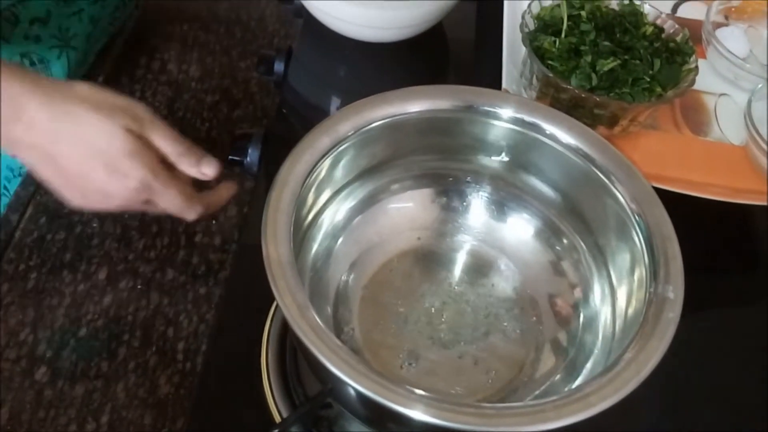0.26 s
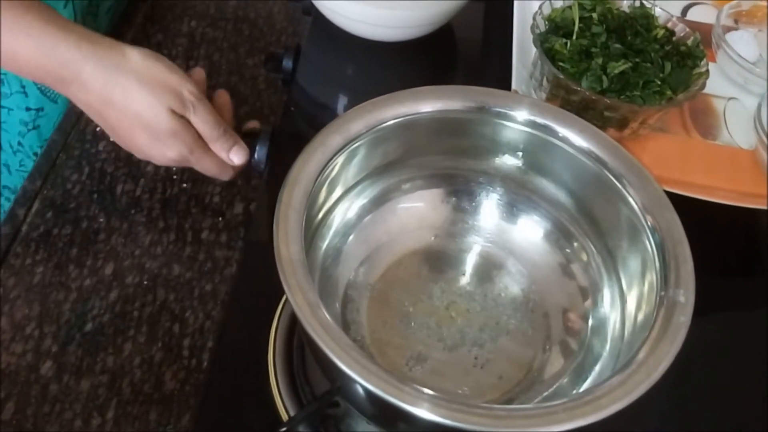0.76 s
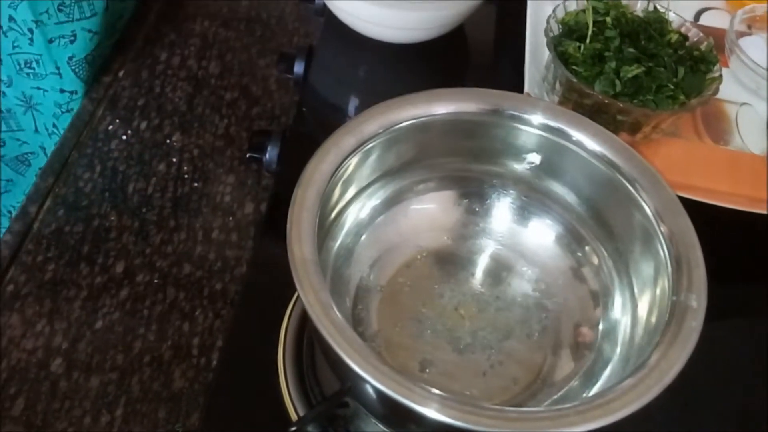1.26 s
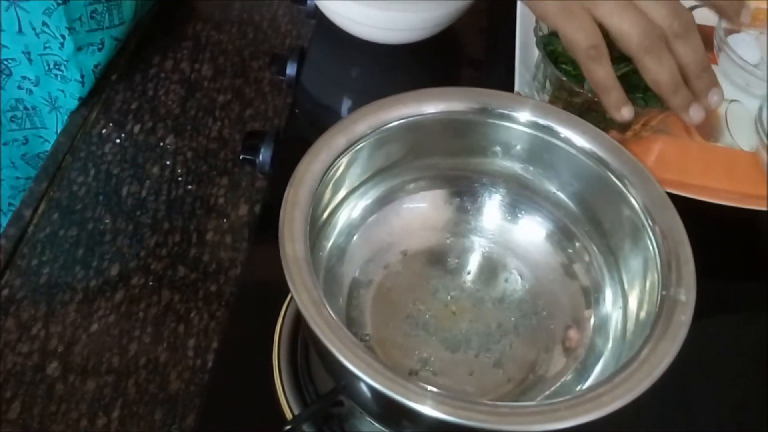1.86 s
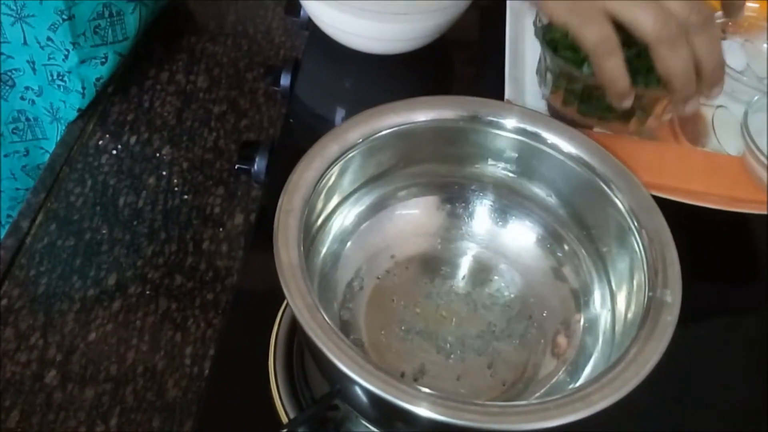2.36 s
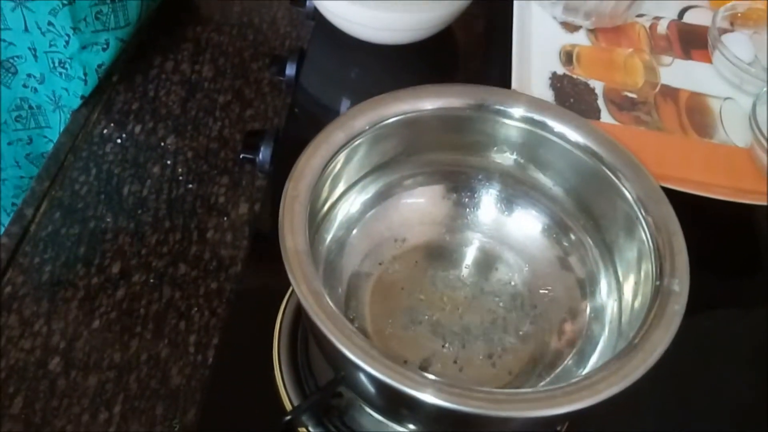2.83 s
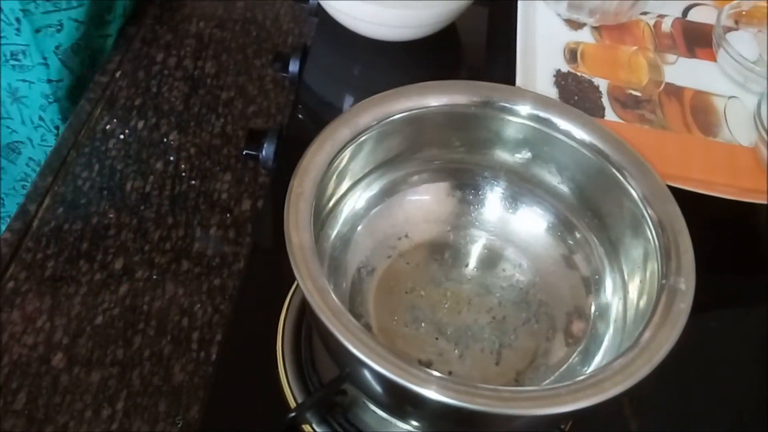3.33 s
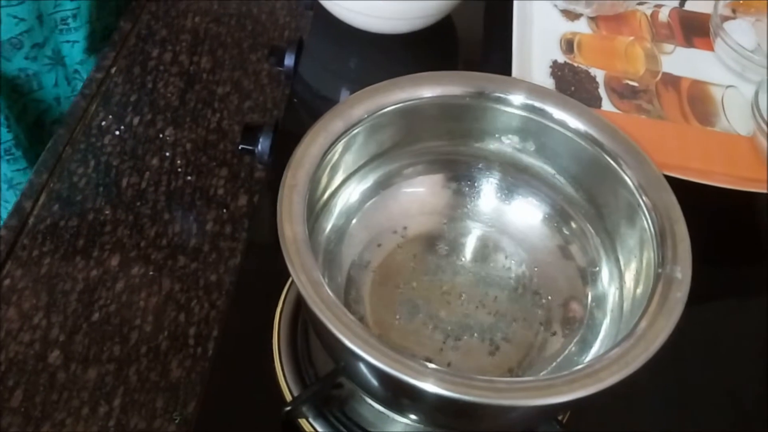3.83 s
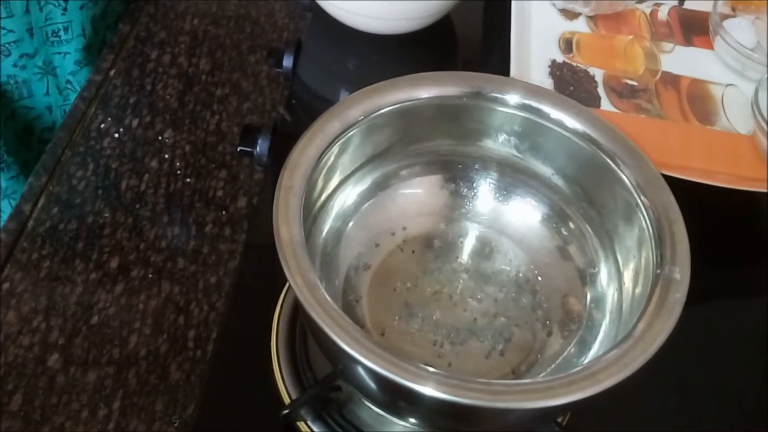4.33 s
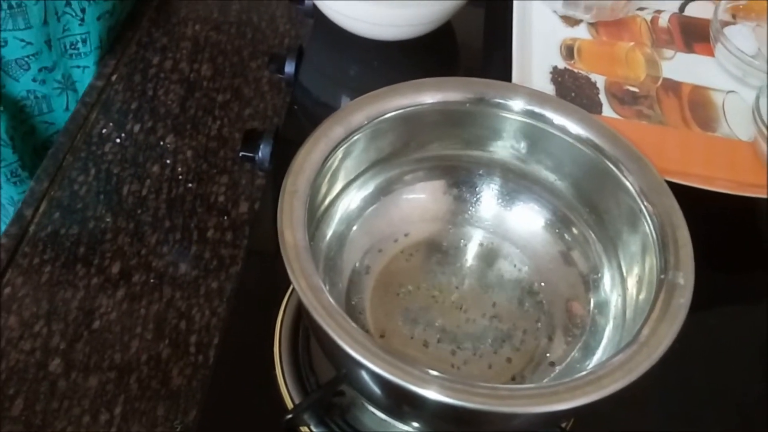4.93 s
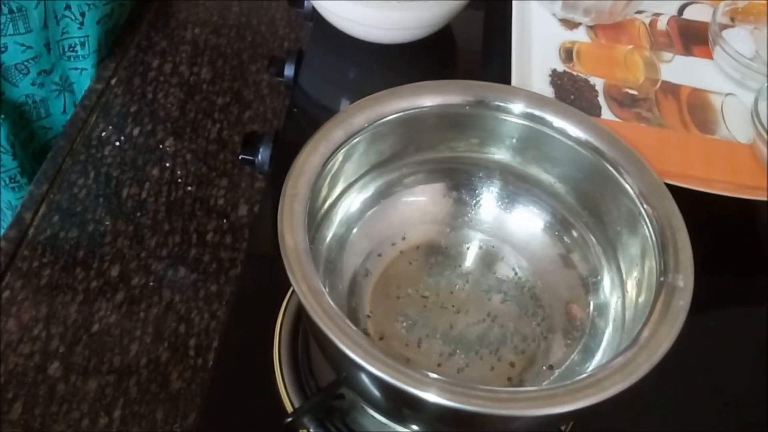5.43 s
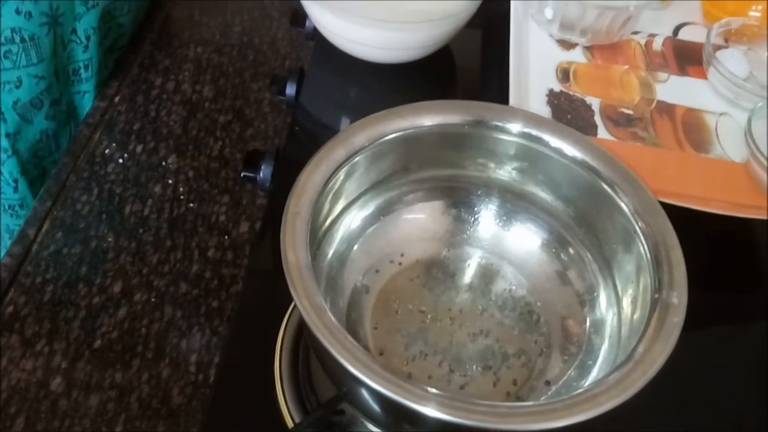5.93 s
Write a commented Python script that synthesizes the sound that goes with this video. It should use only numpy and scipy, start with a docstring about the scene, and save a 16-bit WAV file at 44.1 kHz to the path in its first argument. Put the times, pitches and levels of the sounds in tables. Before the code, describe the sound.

Rapid, uneven popping of seeds in oil, dry and snappy, with small metallic pings from the pot wall and quick ticks of droplets. A quiet low room noise and thin sizzle lie underneath. Popping thickens after the first second and continues to the end, interrupted by nothing but joined by a short dull scrape past the middle. Close stereo microphone, left side louder, short bright kitchen reflections.

```python
"""Low house noise, mostly in opposite phase at two ports, and fine crackle run throughout a small hard kitchen.
Seeds burst in hot oil in a round steel pot from the first moments: pitched cracks scattered by the pot,
each shaking its wall; the room answers. From 1.4 s spatter strikes the left port and wet bursts throw
ticking droplets. Near 3.3 s a pure low tone swells once, then something is dragged on the counter."""
import sys
import numpy as np
from scipy import signal
from scipy.fft import rfft, irfft, next_fast_len
from scipy.io import wavfile

SR = 44100
rng = np.random.default_rng(int(sys.argv[2]) if len(sys.argv) > 2 else 0)


def unload_wav(signal):
    """Save mono or channel-first audio to the path in sys.argv[1] as 16-bit WAV at rate SR, clipped to [-1, 1]."""
    wavfile.write(
        sys.argv[1],
        SR,
        np.round(np.clip(np.atleast_2d(signal).T, -1, 1) * 32767).astype(np.int16),
    )


def linear_from_db(decibels):
    """Turn decibels (scalar or array-like) into linear amplitude factors; 0 gives 1."""
    return 10 ** (np.asarray(decibels, float) / 20)


N = 272793
SPOTS = 4  # places on the pot bottom where seeds burst


def at_hz(points, hz, column=1):
    """Table column interpolated over log frequency."""
    points = np.array(points)
    return np.interp(np.log(hz + 1), np.log(points[:, 0]), points[:, column])


def causal(db):
    """Minimum-phase response with the given levels on an rfft grid."""
    cepstrum = irfft(db * np.log(10) / 20)
    half = len(cepstrum) // 2
    cepstrum[1:half] *= 2
    cepstrum[half + 1:] = 0
    return np.exp(rfft(cepstrum))


def convolve(x, response):
    """FFT convolution, cut to N samples."""
    size = next_fast_len(N + response.shape[-1])
    return irfft(rfft(x, size) * rfft(response, size), size)[..., :N]


def dying(t60_s, size):
    """Exponential decay, 60 dB down after t60_s."""
    return linear_from_db(-60 * np.arange(size) / (t60_s * SR))


# Left-right likeness of steady noise. Each row: frequency in Hz, correlation (limited to -1..1).
LIKENESS = [(60, -1.16), (130, -0.85), (300, -1), (650, -0.15), (1400, 0.15)]


def steady(points, lines=()):
    """Stereo noise of a given spectrum and narrow lines, port likeness set by frequency; rms 1."""
    size = next_fast_len(N)
    hz = np.fft.rfftfreq(size, 1 / SR)
    mid, side = rfft(rng.standard_normal((2, size)))
    alike = np.clip(at_hz(LIKENESS, hz), -1, 1)
    pair = np.sqrt(1 + alike) * mid + np.sqrt(1 - alike) * side * [[1], [-1]]
    level_db = at_hz(points, hz)
    for line_hz, width_hz, db in lines:
        level_db = level_db + db / (1 + (2 * (hz - line_hz) / width_hz) ** 2)
    noise = irfft(pair * linear_from_db(level_db), size)[:, :N]
    return noise / np.sqrt(np.mean(noise ** 2) + 1e-20)


# Spectrum of house noise and sizzle. Each row: frequency in Hz, relative density in dB per Hz.
FLOOR_SPECTRUM = [(30, -17), (110, -3.5), (190, -5.5), (300, -9), (800, -12), (1200, -16), (2200, -16),
                  (5500, -4.5), (8000, -7.5), (16000, -18)]
# Wavering hum lines. Each row: frequency in Hz, width in Hz, height over the house noise in dB.
HUM_LINES = [(129.4, 7.6, 4.5), (429.8, 6.1, 10.5), (488, 10.5, 9.5)]
# Swelling and sinking of the lows. Each row: time in seconds, relative level in dB.
RUMBLE = [(0, -40), (.15, -48.5), (.5, -48.5), (3.2, -46.5), (6.19, -44)]


def house_and_sizzle():
    """Steady noise: the lows swell and sink, the rest holds its level."""
    floor = steady(FLOOR_SPECTRUM, HUM_LINES)
    lows = signal.sosfilt(signal.butter(1, 700, fs=SR, output="sos"), floor)
    swell_db = np.interp(np.arange(N) / SR, *np.transpose(RUMBLE))
    return linear_from_db(swell_db + 17.5) * lows + linear_from_db(-50.5) * (floor - lows)


# Colour of pot mouth and microphone. Each row: frequency in Hz, left level in dB, right level in dB.
MOUTH = [(292, -70, -25), (735, -1, -14.5), (1260, -15.5, -9.5), (1730, 1, -9.5), (2070, -8, -10),
         (3100, 3.5, -2.5), (3900, 6, -3), (4400, 1.5, -12), (5000, 6.5, 3.5), (7050, 2.5, 6),
         (7580, -2.5, -2), (18200, -18, -48.5)]
# The first paths build up and die fast; later ones are weaker and last longer.
RISE_T60_S, FRONT_T60_S, LATE_DB = 0.002, 0.005, -10


def cracks(s, peak_db, pitch_hz, spit_db, scatter_t60_s):
    """A steam bubble rings a few cycles; the curved pot sends it by many short paths, others to each port."""
    size = 1024
    hz = np.fft.rfftfreq(size, 1 / SR) + 1
    path_decay = dying(FRONT_T60_S, size) + linear_from_db(LATE_DB) * dying(scatter_t60_s, size)
    paths = rng.standard_normal((len(s), 2, size)) * (1 - dying(RISE_T60_S, size)) * path_decay
    tune = hz / pitch_hz[:, None]
    bubble = 1 / (1 + 4j * (tune - 1 / tune))
    treble = 1 / (1 + 1 / (1j * hz / 8500)) ** 2
    colour = bubble + 0.45 + linear_from_db(spit_db)[:, None] * treble
    mouth = np.array([causal(at_hz(MOUTH, hz, column=c)) for c in (1, 2)])
    response = colour[:, None] * mouth
    shapes = irfft(rfft(paths) * response)
    # both ports get the same share of each burst
    heard = np.linalg.norm(shapes, axis=2) / np.linalg.norm(response, axis=2)
    shapes[:, 1] *= (heard[:, 0] / heard[:, 1])[:, None]
    left_peak = np.abs(shapes[:, 0]).max(axis=1)
    shapes *= (linear_from_db(peak_db) / left_peak)[:, None, None]
    out = np.zeros((SPOTS, 2, N + size))
    for k, (start, shape) in enumerate(zip((s * SR).astype(int), shapes)):
        out[k % SPOTS, :, start:start + size] += shape
    return out[..., :N]


# Slow change of the treble spit. Each row: time in seconds, change in dB.
LIVELY = [(0, -8), (.7, -3.5), (1.5, -0.5), (2.0, -1.5), (2.5, -1.5), (3.2, -4), (3.9, 2.5), (4.5, -3.5),
          (5.3, -3.5), (5.7, -9.5), (6.19, -14)]
SPIT_DB, SPIT_AT_HZ, SPIT_DB_PER_OCTAVE, SPIT_CHANCE_DB = 1.5, 4700, 22, 5


def spit(s, pitch_hz, chance):
    """Treble drive of each burst in dB: higher cracks spit more."""
    lively_db = np.interp(s, *np.transpose(LIVELY))
    pitch_db = SPIT_DB_PER_OCTAVE * np.log2(pitch_hz / SPIT_AT_HZ)
    return SPIT_DB + pitch_db + lively_db + SPIT_CHANCE_DB * chance


CRACKLES_PER_S, CRACKLE_DB, CRACKLE_SPREAD_DB = 85, -35, 4.5
CRACKLE_LOW_HZ, CRACKLE_HIGH_HZ = 3400, 6800


def crackle():
    """Small bursts at random, most of them faint, a few clearly heard."""
    draw = rng.random((int(CRACKLES_PER_S * N / SR), 4))
    s = draw[:, 0] * N / SR
    peak_db = CRACKLE_DB - CRACKLE_SPREAD_DB * np.log(draw[:, 1] + 0.05)
    pitch_hz = CRACKLE_LOW_HZ + (CRACKLE_HIGH_HZ - CRACKLE_LOW_HZ) * draw[:, 2]
    spit_db = spit(s, pitch_hz, 2 * draw[:, 3] - 1)
    return cracks(s, peak_db, pitch_hz, spit_db, scatter_t60_s=0.01)


# Single seed bursts. Each row: start in seconds, left peak in dB, pitch of the crack in Hz.
POPS = [(.049, -4.5, 7000), (0.175, -23, 6700), (.277, -26, 3900), (0.34, -5, 7400), (0.353, -9, 5000),
        (0.37, -4, 4280), (0.569, -19, 3730), (0.602, -0.5, 5500), (0.647, -2, 3540), (0.7017, 7.5, 5700),
        (0.7735, -8.5, 5400), (0.8266, -7, 5440), (0.985, -13.5, 4540), (1.046, -22, 5000),
        (1.062, 1, 3100), (1.184, 1.5, 3700), (1.2392, -9, 5500), (1.3116, -3, 5300), (1.4414, 0.5, 5400),
        (1.488, 0.5, 6400), (1.494, 0, 2840), (1.5326, -1.5, 4700), (1.552, -4, 3240), (1.64, -4.5, 4200),
        (1.6483, 0, 5330), (1.664, -10, 4800), (1.6722, -6, 5000), (1.7482, -15, 4000), (1.7568, 8, 5630),
        (1.77, 5, 3680), (1.865, 4, 4160), (1.8707, -1, 3700), (1.902, -13, 4080), (1.9236, -1, 5330),
        (1.9509, 0, 4100), (1.98, -3, 5000), (2.006, -7.5, 3800), (2.039, -15.5, 5700), (2.1751, -10, 4700),
        (2.1857, -6, 5200), (2.222, -10.5, 3900), (2.2599, 4, 5100), (2.303, -15, 6000), (2.342, 2, 5000),
        (2.372, -3, 4700), (2.4142, 1.5, 5350), (2.4314, -10, 5500), (2.486, -2, 5000),
        (2.5675, -15.5, 6250), (2.6122, -19.5, 4600), (2.6405, -4.5, 5300), (2.7032, -13, 4700),
        (2.722, -3, 4400), (2.771, -11, 5400), (2.8174, 3.5, 2900), (2.92, 4, 4700), (2.9519, -3, 4270),
        (2.9557, 5.5, 4130), (3.0365, -4, 5050), (3.072, -6.5, 5000), (3.0836, -5.5, 3770),
        (3.124, 9.5, 5300), (3.1527, 4, 4700), (3.216, 2, 4730), (3.238, -10, 5500), (3.241, 2, 5850),
        (3.285, -8, 5300), (3.3055, 2, 5130), (3.3216, 3, 3900), (3.334, -9, 3900), (3.4487, -7, 6560),
        (3.462, -3, 4400), (3.5141, -9, 5340), (3.5253, -5, 4760), (3.5761, 4, 3800), (3.6947, -12, 6700),
        (3.74, -13.5, 5500), (3.755, 1.5, 4740), (3.77, -1, 3450), (3.778, -0.5, 4350), (3.8557, 7.5, 4800),
        (3.8855, -18, 5700), (3.9232, -3, 5000), (3.9319, -1, 3240), (4.0108, -8.5, 4500),
        (4.0248, -9, 3900), (4.046, 1, 5000), (4.0549, -4.5, 5400), (4.2191, -0.5, 4200), (4.287, -9, 3700),
        (4.308, -6.5, 3120), (4.3267, -3, 4600), (4.367, -9, 4700), (4.4845, 0, 5400), (4.5124, -1, 5670),
        (4.546, -2, 4160), (4.5703, 2, 4360), (4.581, 1.5, 4160), (4.6163, 2, 3740), (4.6227, -4.5, 5600),
        (4.7639, -9.5, 6500), (4.8, -4.5, 4100), (4.826, -14, 4530), (4.8578, -2.5, 4400),
        (4.9291, 2, 5030), (5.051, -10, 5560), (5.0836, 3.5, 3900), (5.0934, 1, 5060), (5.1413, -6, 4930),
        (5.15, -21, 4950), (5.1696, -2, 5300), (5.2166, -8, 4430), (5.2536, -5.5, 3900), (5.29, 1.5, 4500),
        (5.311, -15, 4350), (5.3267, 5.5, 4700), (5.3503, 2, 4630), (5.371, -4.5, 3320),
        (5.4552, -8.5, 3980), (5.518, -5.5, 3930), (5.6113, 1, 4270), (5.6927, -0.5, 4400),
        (5.7622, -14, 6200), (5.773, 1.5, 3750), (5.8537, -0.5, 5000), (5.8806, -11.5, 3400),
        (5.9036, 3.5, 5200), (5.9517, -4, 3800), (6.0965, -0.5, 4170), (6.1028, -8, 4470),
        (6.1397, -8.5, 5600), (6.152, -2, 3900)]


def pops():
    """Timed bursts, loud and faint: steam cracks scattered inside the pot."""
    s, peak_db, pitch_hz = np.transpose(POPS)
    spit_db = spit(s, pitch_hz, rng.standard_normal(len(s)))
    return cracks(s, peak_db, pitch_hz, spit_db, scatter_t60_s=0.024)


# Seeds thrown against the wall. Each row: time in seconds, blow in dB, extra on the lowest mode in dB
# (strong when the blow lands near the bottom).
WALL_HITS = [(0.647, -47.5, 10), (1.183, -48.5, 14), (1.756, -44, -25), (3.072, -45.5, 4),
             (3.152, -46, -19), (3.318, -43, 6), (3.755, -39.5, 17.5), (3.857, -40.5, -3),
             (4.223, -45.5, -28), (4.484, -54, 30), (5.326, -39.5, 7), (5.518, -49, 21.5)]
# Pot wall modes. Each row: frequency in Hz, relative level in dB, t60 in seconds.
WALL_MODES = [(715, 5, .04), (1308, 11, .55), (1770, 2, .1)]
SHAKE_DB, SHAKE_CHANCE_DB = -56, 4  # shake of each burst relative to its peak, and its random spread


def wall():
    """Every timed burst and thrown seed strikes each mode, a decaying sine, with a strength of its own."""
    shakes = [(s, db + SHAKE_DB + SHAKE_CHANCE_DB * rng.standard_normal(), -10) for s, db, _ in POPS]
    s, blow_db, low_db = np.transpose(list(shakes) + list(WALL_HITS))
    chance_db = 2 * rng.standard_normal((len(s), len(WALL_MODES)))
    chance_db[:, 0] += low_db
    out = np.zeros(N)
    for k, (hz, mode_db, t60_s) in enumerate(WALL_MODES):
        clicks = np.full(N, 1e-18)
        clicks[(s * SR).astype(int)] = linear_from_db(blow_db + mode_db + chance_db[:, k])
        r, w = linear_from_db(-60 / (t60_s * SR)), 2 * np.pi * hz / SR
        out += signal.lfilter([0, np.sin(w)], [1, -2 * r * np.cos(w), r * r], clicks)
    return out * [[1], [-linear_from_db(-29.0)]]


# Room answer. Each row: frequency in Hz, t60 in seconds, relative level in dB.
ROOM = [(504, 0.21, 3.5), (2030, 0.27, 5), (5000, 0.31, -3.5), (8600, 0.27, -0.5), (14900, 0.26, 3.5)]


def kitchen(x, first_ms, build_ms):
    """Noise dying band by band, another for each spot; the first walls answer after first_ms."""
    size = SR * 2 // 5
    edges_hz = 200 * 2 ** np.arange(0, 6.6, 0.5)
    white = rng.standard_normal((2, SPOTS, 2, size))
    out = 0
    for k, (low, high) in enumerate(zip(edges_hz, edges_hz[1:])):
        band_filter = signal.butter(2, [low, high], "band", fs=SR, output="sos")
        band = signal.sosfilt(band_filter, white[k % 2])
        centre_hz = np.sqrt(low * high)
        out = out + band * dying(at_hz(ROOM, centre_hz), size) * linear_from_db(at_hz(ROOM, centre_hz, column=2))
    ms = np.arange(size) * 1000 / SR
    response = out * np.clip((ms - first_ms) / build_ms, 0, 1)
    response = response / np.sqrt(np.sum(response ** 2) / 2 / SPOTS)
    return convolve(x, response).sum(axis=0)


# Spatter on the left port. Each row: start in seconds, drive in dB, decay time in milliseconds.
SPATTER = [(1.4407, -2.5, 0.24), (2.305, -11, 0.58), (2.722, 8, 0.057), (3.755, -7.5, 0.3),
           (3.858, -4, 1.05), (4.056, -10, 0.33), (4.353, -15.5, 0.87), (4.482, -15, 1.6),
           (5.083, -4, 0.25)]
PORT_LOW_HZ = 60


def spatter():
    """One-sided push: the membrane goes in quickly, relaxes and swings back slowly."""
    size = 2000
    out, t = np.zeros(N + size), np.arange(size) / SR
    for s, drive_db, length_ms in SPATTER:
        u = t * 1000 / length_ms
        push = (1 - np.exp(-u * 3.4)) * (np.exp(-u) - 0.3 * np.exp(-u * 0.29))
        start = int(s * SR)
        out[start:start + size] -= 2 * linear_from_db(drive_db) * push
    high_pass = signal.butter(1, PORT_LOW_HZ, "high", fs=SR, output="sos")
    return signal.sosfilt(high_pass, out[:N]) * [[1], [0]]


# Wet bursts throwing droplets. Each row: start in seconds, highest droplet peak in dB.
SPRAYS = [(1.49, -10.5), (1.757, -27), (1.865, -27), (2.415, -26), (2.957, -12), (3.856, -12),
          (4.358, -14.5), (4.485, -9), (5.327, -16)]
DROPLETS_PER_SPRAY, SPRAY_S, DROPLET_HZ, DROPLET_SPIT_DB = 20, 0.022, 6000, 9


def sprays():
    """Droplets land in quick bright ticks that thin out."""
    s, peak_db = np.repeat(SPRAYS, DROPLETS_PER_SPRAY, axis=0).T
    draw = rng.random((len(s), 3))
    late_s = -SPRAY_S * np.log(draw[:, 0] + 0.02)
    pitch_hz = DROPLET_HZ * (0.7 + 0.6 * draw[:, 1])
    spit_db = np.full(len(s), DROPLET_SPIT_DB)
    return cracks(s + late_s, peak_db - 8 * draw[:, 2], pitch_hz, spit_db, scatter_t60_s=0.01)


SWELL_S, SWELL_HZ, SWELL_DB, SWELL_RISE_S, SWELL_FALL_S = 3.31, 122.5, -34.5, 0.17, 0.17


def hum_swell():
    """A steady low sine rises and falls once, in opposite phase at the ports."""
    since = np.arange(N) / SR - SWELL_S
    shape = np.exp(-(since / np.where(since < 0, SWELL_RISE_S, SWELL_FALL_S)) ** 2)
    return linear_from_db(SWELL_DB) * shape * np.sin(2 * np.pi * SWELL_HZ * since) * [[1], [-1]]


DRAG_S, DRAG_DB, DRAG_ATTACK_S, DRAG_HOLD_S, DRAG_FADE_DB_PER_S = 3.47, -31.5, 0.076, 0.051, 70


def drag():
    """Something dragged on the counter: low scraping noise swells, holds and fades."""
    since = np.arange(N) / SR - DRAG_S
    fade_db = DRAG_FADE_DB_PER_S * np.maximum(since - DRAG_ATTACK_S - DRAG_HOLD_S, 0)
    shape = np.clip(since / DRAG_ATTACK_S, 0, 1) ** 2 * linear_from_db(DRAG_DB - fade_db)
    return shape * steady([(60, -6), (170, 10.5), (550, -1), (1200, -58)])  # (Hz, dB per Hz)


def scene():
    """Pot, its room answer, spatter and background at the two ports."""
    pot = pops() + crackle() + sprays()
    pot[0] += wall()
    room = kitchen(pot, first_ms=3.0, build_ms=8.0)
    direct = pot.sum(axis=0) * linear_from_db([[0], [-4]])  # the right port faces away from the pot
    background = (house_and_sizzle() + drag() + hum_swell()) * linear_from_db([[2.5], [-2.5]])
    return direct + linear_from_db([[-6], [-3]]) * room + spatter() + background


def roll_off(x):
    """The treble ends steeply here."""
    return signal.sosfilt(signal.butter(12, 16640, fs=SR, output="sos"), x)


def record(dry):
    """The loudest pops overload the input; the top is cut at 16 kHz."""
    overloaded = np.clip(dry, -1, 1)
    low_pass = signal.cheby2(8, 30, 16000, fs=SR, output="sos")
    mix = np.clip(signal.sosfilt(low_pass, overloaded), -1, 1)
    return roll_off(mix)


dry = scene()
out = record(dry)
unload_wav(out)
```